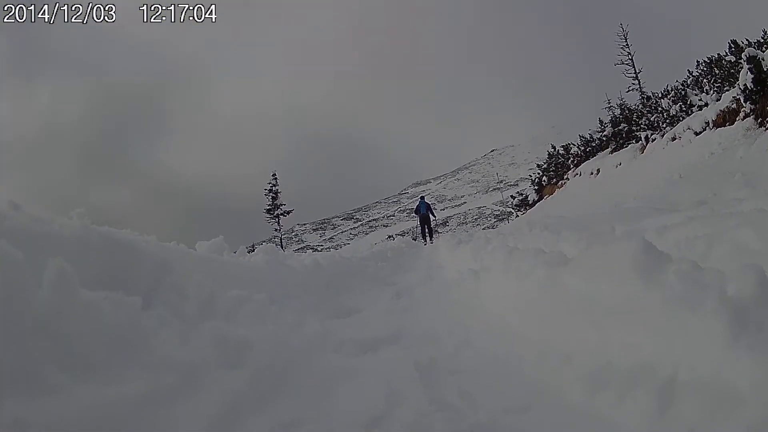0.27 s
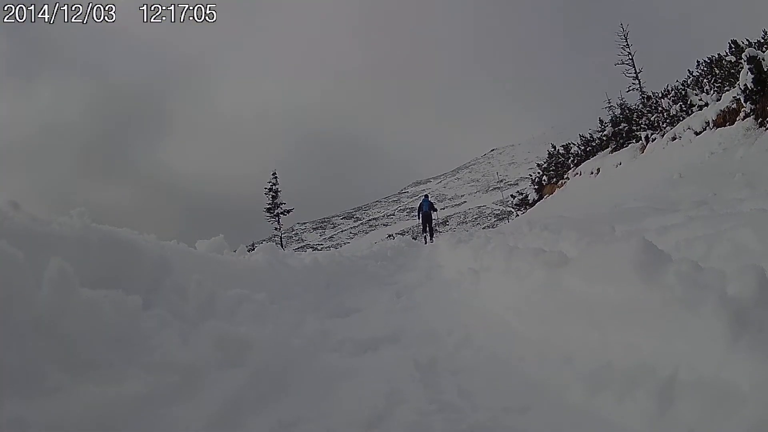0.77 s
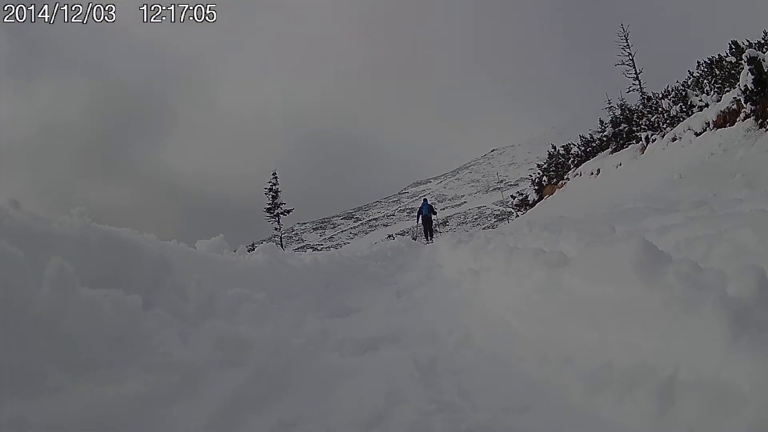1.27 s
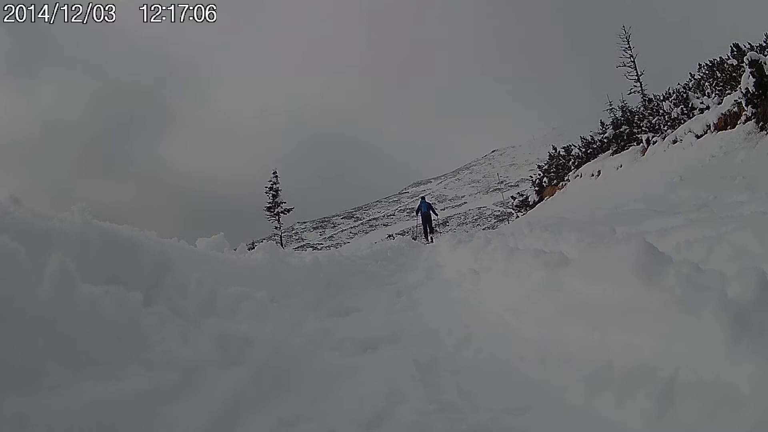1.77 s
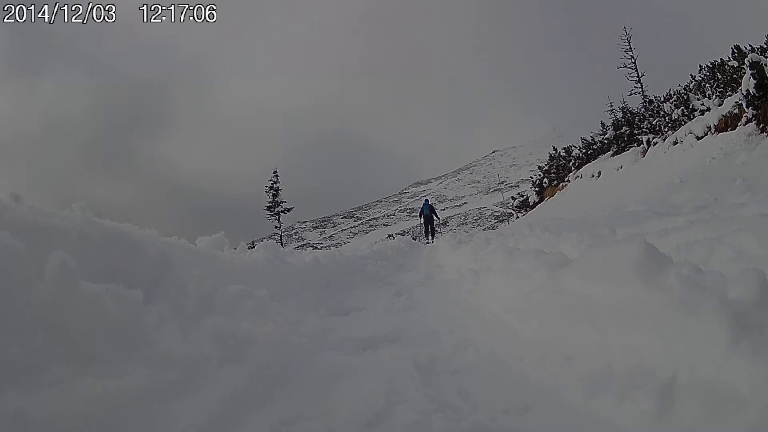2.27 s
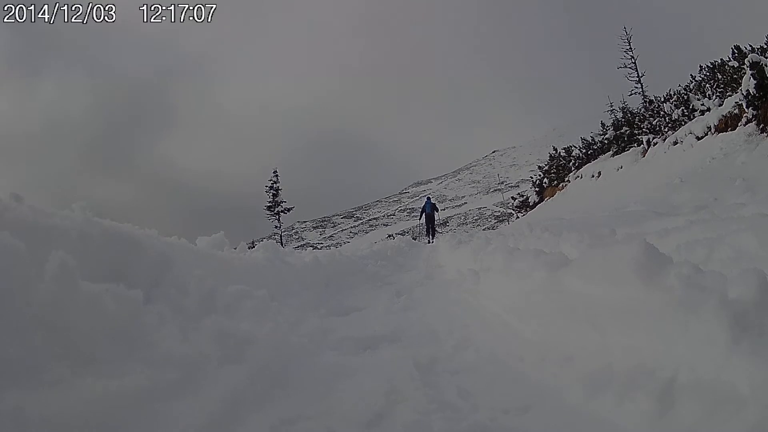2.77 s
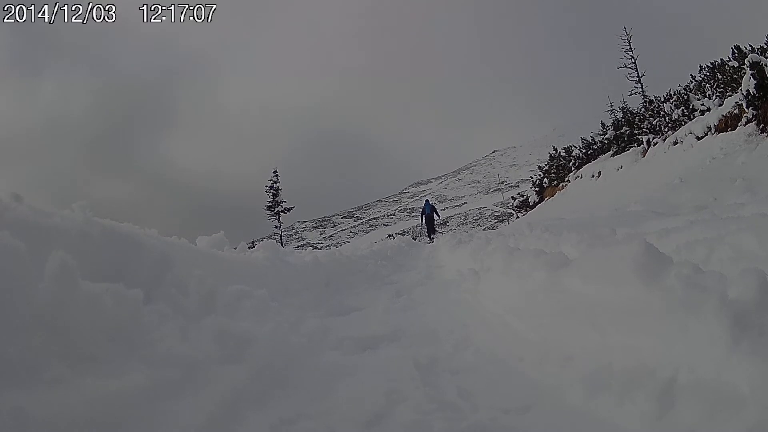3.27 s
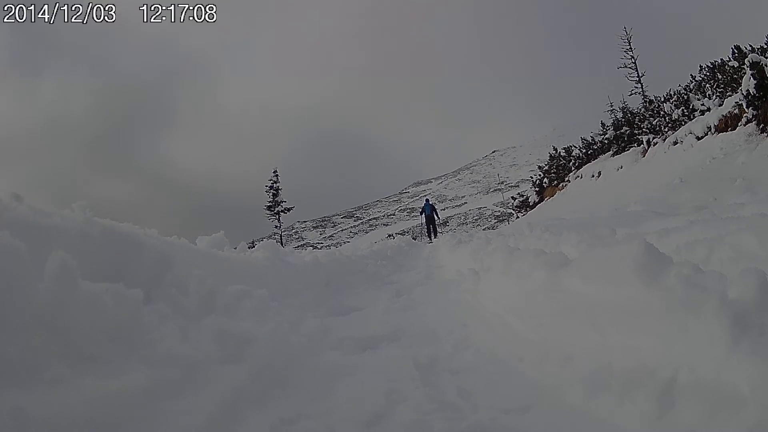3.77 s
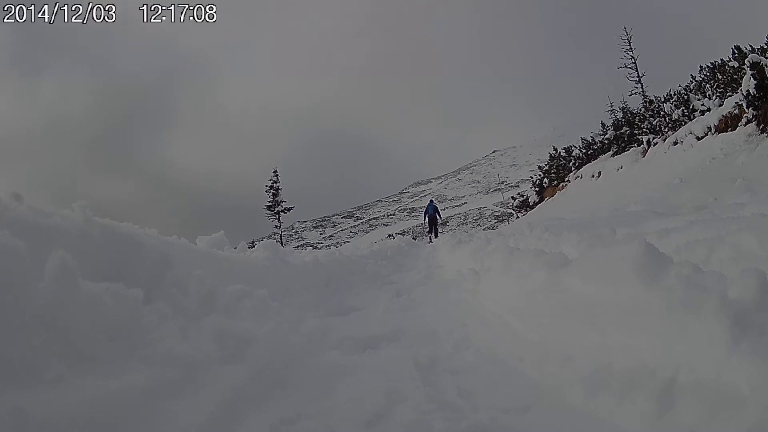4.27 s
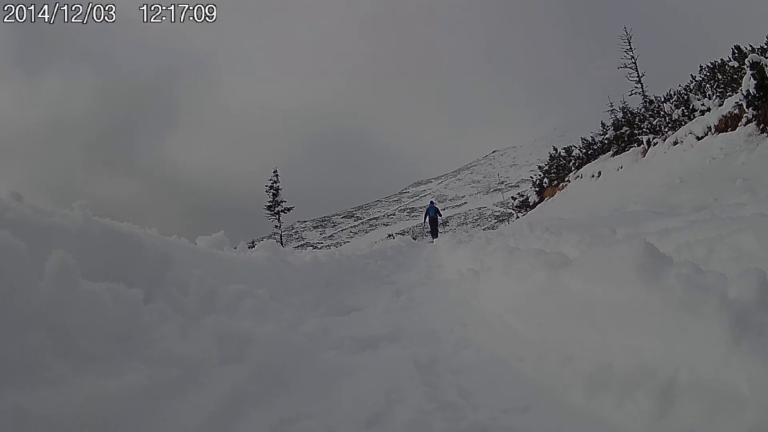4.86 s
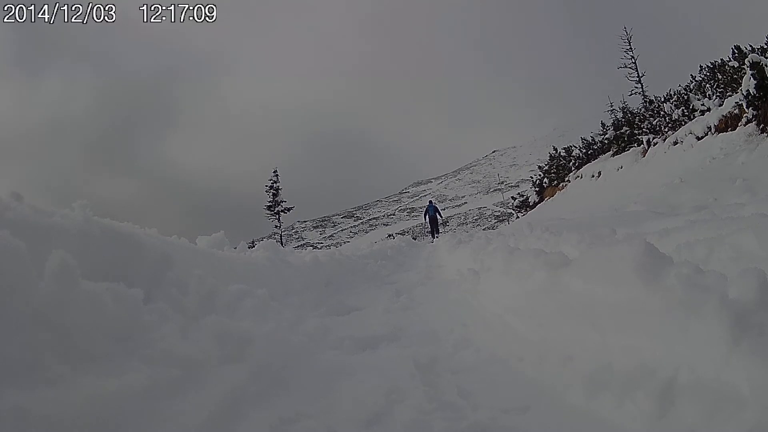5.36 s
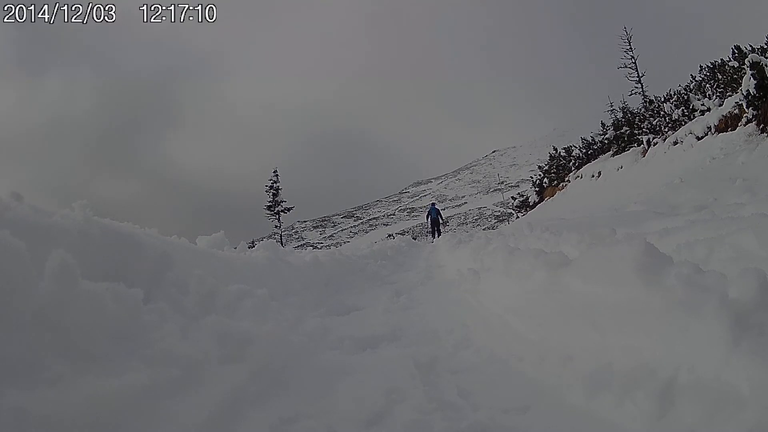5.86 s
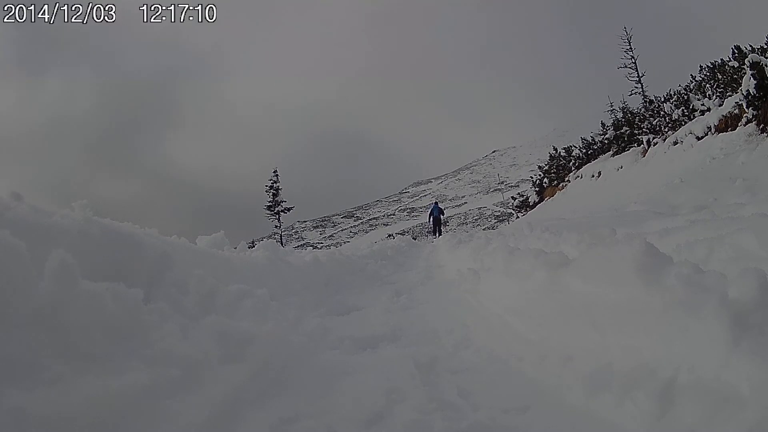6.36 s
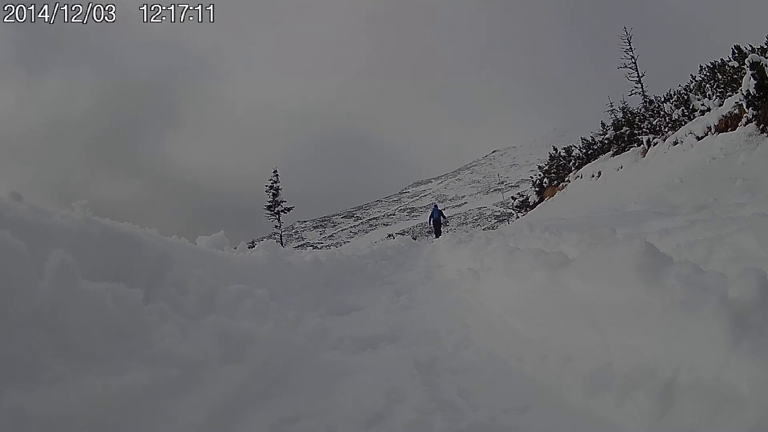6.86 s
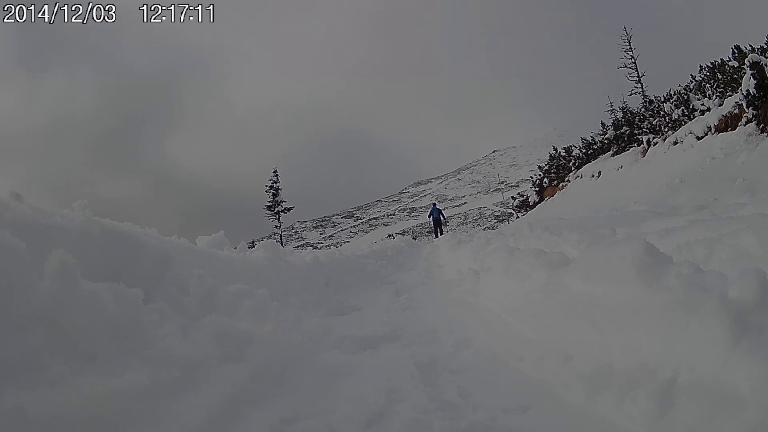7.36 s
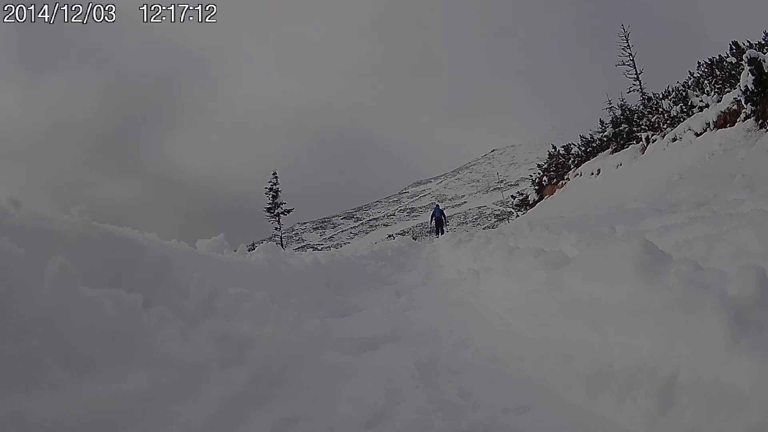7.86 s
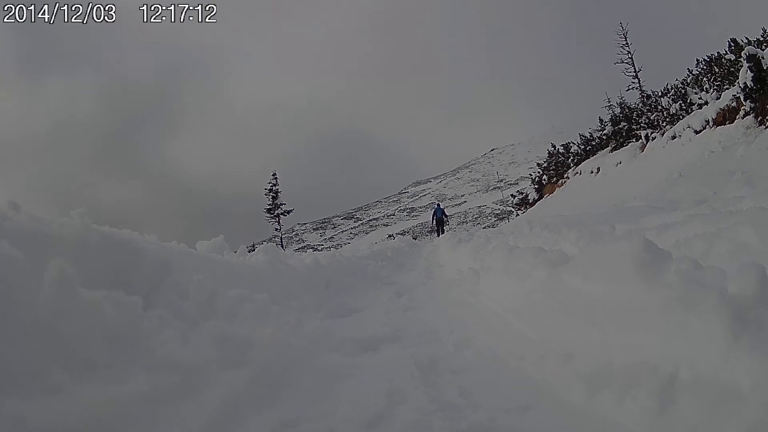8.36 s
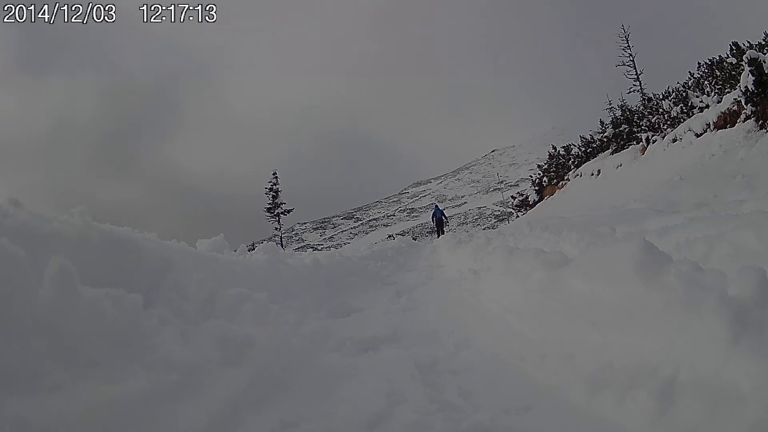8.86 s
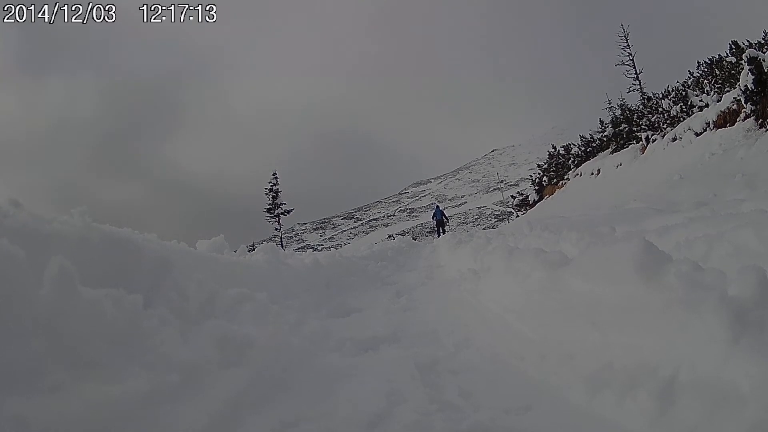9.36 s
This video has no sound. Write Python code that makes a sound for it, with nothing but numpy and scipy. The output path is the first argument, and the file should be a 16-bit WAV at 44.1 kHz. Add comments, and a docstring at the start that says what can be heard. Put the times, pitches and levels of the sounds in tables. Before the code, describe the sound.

Handling noise from a small camera lying in snow: low booms, scuffs, crunches and creaks, a long faint lull, then another burst, over steady hiss.

```python
"""Low booms and soft scuffs come first, then the crunch and creak of snow, all in the left channel.
A small camera lies in deep snow on a slope, and the snow packs and slips against its housing.
Each slip rings the housing: single slips crunch, slips in quick succession creak, a few go tock.
Shoves rock it with a boom, loosened grains rub it; the loudest hits overload the recorder with a crackle.
Behind this lie hiss and the whine and chirr of the electronics; the right channel holds only hiss."""
import sys
import numpy as np
from scipy import signal
from scipy.fft import rfft, irfft
from scipy.io import wavfile
from scipy.ndimage import uniform_filter1d, map_coordinates

SR = 44100
rng = np.random.default_rng(int(sys.argv[2]) if len(sys.argv) > 2 else 0)


def store_pcm(level_fs):
    """Save levels as 16-bit WAV."""
    pcm = np.round(np.clip(level_fs, -1, 1) * 32767).astype(np.int16)
    wavfile.write(sys.argv[1], SR, np.atleast_2d(pcm).T)


N = 424241  # length of the scene in samples
RING_S = np.arange(4096) / SR  # time axis of one ring [s]
LEAD_S = .012  # time the grains chatter before a release [s]


def gain_of(db):
    """Turns decibels into a factor."""
    return 10 ** (np.asarray(db) / 20)


def unit(x):
    """Scales a sound to energy 1."""
    return x / np.sqrt(np.sum(x ** 2) + 1e-20)


def rms_10ms(x):
    """Scales a sound so that energy 1 becomes an rms of 1 over 10 ms."""
    return x * np.sqrt(SR / 10 ** 2)


def add(mix, s, sound):
    """Lays a sound into the mix at time s."""
    part = mix[max(round(s * SR), 0):][:len(sound)]
    part += sound[:len(part)]


def band(x, hz, kind, order):
    """Keeps part of the frequency range with a Butterworth filter."""
    sos = signal.butter(order, np.minimum(hz, SR / 2 - 1), kind, fs=SR, output="sos")
    return signal.sosfilt(sos, x)


def ring(modes, t):
    """Sums the damped sines that follow one blow; t60 is the time to fade by 60 dB."""
    return sum(gain_of(db - 60 * t / t60) * np.sin(2 * np.pi * hz * t) for hz, db, t60 in modes)


# how firmly the snow presses on the camera: (time [s], pressure [0-1])
SNOW_PRESSURE = [(7.32, 0), (7.41, 0.91), (8.57, 0.87), (8.68, 0.04)]


def pressure(s):
    """Gives how firmly the snow presses at time s, from 0 to 1."""
    return np.clip(np.interp(s, *np.transpose(SNOW_PRESSURE)), 0, 1)


# ways the housing rings, levels relative within a register:
# (frequency [Hz], level lying loose [dB], level pressed into the snow [dB], fade t60 [s])
HOUSING_MODES = [(168.8, -21.5, -3.5, 0.12), (285.4, -7.5, 2.5, 0.099), (393.7, 1.5, 10.5, 0.023),
                 (458.2, 2.5, -7.5, 0.038), (626, 5, -3.5, 0.0063), (780, -13, -23.5, 0.0067),
                 (948, -2.5, 12.5, 0.022), (1226.5, 6.5, 15.5, 0.013), (1351, -5.5, 10.5, 0.027),
                 (1470, -14.5, 5, 0.03), (1931, -11.5, -12, 0.04), (2006.4, 5.5, 16, 0.019),
                 (2257, -6, 11.5, 0.0058), (2564, -16, -7.5, 0.0099), (2900, -12.5, 2, 0.018)]
# pitch ranges of the housing, in order knock, clack and ring: (low edge [Hz], high edge [Hz])
PITCH_RANGES = [(150, 700), (700, 1750), (1750, 3400)]


def housing(skirt=1.45, muffle_hz=2900):
    """Prepares the housing's modes, sorted into knock, clack and ring; snow swallows the treble."""
    registers = []
    for low, high in PITCH_RANGES:
        members = [mode for mode in HOUSING_MODES if low <= mode[0] < high]
        freqs, loose_db, pressed_db, fades = np.transpose(members)
        modes = []
        for hz, t60 in zip(freqs, fades):
            # steep flanks keep the valleys between the modes dark
            edges = [hz / skirt, hz * skirt]
            modes.append(band(ring([(hz, 0, t60)], RING_S), edges, "bandpass", order=2))
        modes = band(np.array(modes), muffle_hz, "lowpass", order=4)
        # the double length leaves room for the ring to run out
        registers.append((rfft(modes, 2 * len(RING_S)), loose_db, pressed_db))
    return registers


def slip(body, s, length, grit, levels_db, spread=0.52, swell=0.0013, chatter=0.077,
         chatter_hz=1955, contact_db=4.0, detune=0.027):
    """Grains chatter up to one release and die away; the housing rings in each register."""
    grit = np.clip(grit, 0, 1)  # 0 is one clean release, 1 is all chatter
    t = RING_S - LEAD_S  # the release is at t = 0
    pressed = pressure(s)
    burst = np.exp(-abs(t) / (spread * length))
    force = grit * unit(rng.standard_normal(len(t)) * burst)
    force[round(LEAD_S * SR)] += 1 - grit
    # against a loose housing the friction locks to one pitch: a short squeak
    squeak = unit(burst * np.cos(2 * np.pi * chatter_hz * t))
    force += chatter * (1 - pressed) * squeak
    push = rfft(force, 2 * len(t))
    # soft snow gives way gradually
    rise = 1 + 0.12 * np.tanh((t - swell) / swell)
    # each slip presses on another spot, which shifts the pitch and the balance of the modes
    stretch = 1 + detune * grit * rng.standard_normal()
    read_at = (t * stretch + LEAD_S) * SR
    out = np.zeros(len(t))
    for db, (modes, loose_db, pressed_db) in zip(levels_db, body):
        mode_db = loose_db + pressed * (pressed_db - loose_db)
        mode_db = mode_db + contact_db * grit * rng.standard_normal(len(modes))
        answer = irfft(gain_of(mode_db) @ modes * push)[:len(t)]
        out += gain_of(db) * unit(rise * map_coordinates(answer, [read_at], order=3))
    return out


# single slips, levels relative:
# (time [s], length scale of the chatter [s], level [dB], depth as low knock over high ring [dB])
SINGLE_SLIPS = [(0.2618, 0.0023, -35.5, -11), (0.277, 0.0033, -35, 1), (0.3118, .008, -25, 1),
                (0.336, 0.022, -29, 0), (0.3715, 0.012, -35, 10), (0.457, 0.0048, -21.5, 3),
                (0.8657, 0.0031, -29, -11), (1.003, .004, -31.5, -7), (1.079, 0.0058, -22.5, 4.5),
                (1.249, .005, -17.5, -0.5), (1.2575, 0.0009, -18.5, -0.5), (1.2812, 0.0054, -22.5, -13.5),
                (1.369, 0.004, -20, 5), (1.38, 0.0031, -20.5, -7), (1.6458, .004, -31, -10.5),
                (1.703, 0.0075, -21.5, 2.5), (1.7418, 0.0096, -22.5, -14.5), (1.917, 0.0027, -47.5, -2),
                (2.407, .003, -53, -2), (2.582, 0.0031, -42, -11), (2.622, 0.0027, -40.5, -3),
                (2.77, 0.0029, -43.5, 23), (2.853, 0.0066, -43, -5), (2.897, 0.019, -47, 19),
                (3.061, 0.016, -43, 11.5), (3.4226, 0.0065, -45, -4), (4.22, 0.0044, -36, 0),
                (4.6577, 0.016, -36.5, 4), (4.694, 0.014, -33.5, -3), (7.301, 0.0044, -30.5, -2),
                (7.3767, 0.007, -39, -3), (7.3997, 0.0031, -24, 1.5), (7.42, 0.0017, -23, 7),
                (7.428, 0.0011, -21.5, 1), (7.5576, 0.0065, -40.5, 22), (7.7635, 0.002, -25.5, 2),
                (7.7821, 0.0055, -31, -14), (8.048, .008, -28.5, 15.5), (8.1762, 0.0022, -33.5, -5),
                (8.108, 0.0063, -37, 15), (8.28, 0.0043, -31, 10), (8.306, 0.0037, -31, 6.5),
                (8.475, .003, -30.5, 2), (8.4982, 0.0021, -30.5, 1), (8.5655, 0.0023, -25, -9.5),
                (8.631, 0.0023, -33, -2), (8.674, .003, -32, -7), (8.772, 0.003, -45, 0.5),
                (9.088, 0.0024, -29.5, -5.5), (9.313, 0.0032, -54.5, 28.5)]


def crunches(body, grit=0.72, level_db=-2.5, clack_db=-1.0, packed_clack_db=2.5):
    """Plays separate slips of packed snow; deep ones knock, shallow ones ring."""
    out = np.zeros(N)
    for s, length, db, depth_db in SINGLE_SLIPS:
        middle_db = clack_db + packed_clack_db * pressure(s)
        colour_db = np.array([depth_db / 2, middle_db, -depth_db / 2])
        add(out, s - LEAD_S, slip(body, s, length, grit, db + colour_db))
    return rms_10ms(out) * gain_of(level_db)


# one curve for each creak, levels relative: (time [s], pace [slips per s], level [dB])
CREAK_CURVES = [
    [(0.468, 100, -39), (0.503, 134, -27), (0.535, 82, -36.5), (0.57, 72, -35), (0.595, 61, -31),
     (0.62, 67, -34.5), (0.65, 91, -30), (0.692, 86, -33.5)],
    [(1.099, 105, -33.5), (1.12, 77, -25.5), (1.14, 192, -29.5), (1.243, 212, -29)],
    [(1.302, 53, -30), (1.345, 82, -26), (1.405, 166, -38.5), (1.445, 110, -28), (1.5, 85, -34),
     (1.535, 70, -34.5), (1.565, 99, -22)],
    [(1.72, 90, -35), (1.772, 112, -35), (1.797, 166, -26.5), (1.835, 106, -34), (1.866, 68, -32.5)],
    [(7.665, 67, -33), (7.72, 84, -31.5), (7.81, 90, -29), (7.862, 95, -32.5)],
    [(7.904, 65, -33), (7.935, 58.6, -36.5), (7.965, 99, -33.5), (8.02, 108.5, -32), (8.085, 166, -33.5),
     (8.15, 152, -36), (8.2, 150.5, -32.5), (8.27, 138, -35.5)],
    [(8.287, 44, -35), (8.34, 61, -35.5), (8.385, 105, -32.5), (8.43, 81, -32.5), (8.46, 51, -32)],
]
# colour of a creak at the easy pace:
# (pressure [0-1], low knock [dB], middle clack [dB], high ring [dB])
COLOUR_BY_PRESSURE = [(0, -6, -2.5, 2), (0.999, 2.5, 0, -4.5)]
EASY_RATE = 100  # pace that has the colour above [slips per s]


def creaks(body, length=0.0088, easy_grit=.45, roughening=0.66, polish=0.29, jitter=0.045,
           uneven_db=1.5, fast_knock_db=2.5, level_db=-3):
    """Snow sticks and slips: cleanly and regularly when slow, in uneven smears with more knock when fast."""
    out = np.zeros(N)
    pressures, *colours = np.transpose(COLOUR_BY_PRESSURE)
    for curve in CREAK_CURVES:
        times, rates, levels_db = np.transpose(curve)
        s = times[0]
        while s < times[-1]:
            rate = np.interp(s, times, rates)
            db = np.interp(s, times, levels_db)
            pressed = pressure(s)
            # firm pressure packs the snow smooth, so the creak buzzes at a clearer pitch and sounds deeper
            roughness = min(easy_grit * (rate / EASY_RATE) ** roughening, 1)
            grit = roughness * (1 - polish * pressed)
            colour_db = np.array([np.interp(pressed, pressures, c) for c in colours])
            colour_db[0] += fast_knock_db * np.log2(rate / EASY_RATE)
            size, wait = rng.standard_normal(2)
            sound = slip(body, s, length, grit, db + colour_db + uneven_db * size)
            # the factor keeps the loudness independent of the pace
            add(out, s - LEAD_S, sound * np.sqrt(SR / rate))
            s += np.exp(jitter * grit * wait) / rate
    return out * gain_of(level_db)


# slips that catch the hollow middle mode of the housing, levels relative: (time [s], level [dB])
HOLLOW_SLIPS = [(5.127, -46), (8.6226, -19.5), (8.772, -41)]


def tocks(body, length=0.0027, grit=0.17, knock_db=-19, clack_db=-2, ring_db=-16):
    """Locks the friction to the middle mode: a short hollow tock."""
    out = np.zeros(N)
    colour_db = np.array([knock_db, clack_db, ring_db])
    for s, db in HOLLOW_SLIPS:
        sound = slip(body, s, length, grit, db + colour_db, chatter=0.95, chatter_hz=1190)
        add(out, s - LEAD_S, sound)
    return rms_10ms(out)


# ways the camera rocks on its bed of snow, levels relative: (frequency [Hz], level [dB], fade t60 [s])
ROCKING_MODES = [(57.65, -9.5, 0.81), (83.2, 0, 0.53)]
# shoves that rock the camera and scuff its housing, levels relative: (time [s], level [dB])
CAMERA_SHOVES = [(0.005, -27.5), (0.037, -24), (0.118, -25.5), (0.2, -25.5), (0.288, -22), (1.254, -15.5),
                 (1.382, -13.5), (1.789, -29), (4.227, -48.5), (4.701, -46), (7.429, -14), (7.737, -15.5),
                 (8.0, -20), (8.283, -26), (8.629, -33), (9.321, -43)]
# every single slip kicks the camera too: delay [s], level relative to the slip's table level [dB]
RECOIL_S, RECOIL_DB = .006, -12.5


def rocking(rise_s=.004, overload_level=0.2, lowest_hz=42, level_db=-3.0):
    """Booms as the camera rocks on springy snow; the largest swings overload the microphone and flatten."""
    out, t = np.zeros(N), np.arange(SR) / SR
    swing = ring(ROCKING_MODES, t) * np.tanh(t / rise_s)
    swing = band(swing, lowest_hz, "highpass", order=3)
    recoils = [(s + RECOIL_S, db + RECOIL_DB) for s, _, db, _ in SINGLE_SLIPS]
    for s, db in CAMERA_SHOVES + recoils:
        add(out, s, gain_of(db + level_db) * swing)
    return overload_level * np.tanh(out / overload_level)


def scuffs(body, lag=.012, length=0.02, grit=0.83, knock_db=-19, clack_db=-27, ring_db=-25):
    """Drags the housing over the snow after each shove, with a soft scuff."""
    out = np.zeros(N)
    colour_db = np.array([knock_db, clack_db, ring_db])
    for s, db in CAMERA_SHOVES:
        add(out, s + lag - LEAD_S, slip(body, s, length, grit, db + colour_db))
    return rms_10ms(out)


def rubbing(body, motion, settle=0.098, grains_per_s=700, knock_db=-27, clack_db=-22, ring_db=-20):
    """Loosens grains with each movement; they rub the housing until the snow settles."""
    keep = np.exp(-1 / (settle * SR))
    loose = signal.lfilter([1 - keep], [1, -keep], abs(motion))
    hits = rng.random(N) < grains_per_s / SR
    grains = rng.standard_normal(N) * hits * np.sqrt(SR / grains_per_s)
    rings = [unit(irfft(gain_of(loose_db) @ modes)) for modes, loose_db, _ in body]
    answer = gain_of([knock_db, clack_db, ring_db]) @ np.array(rings)
    return signal.oaconvolve(grains * loose, answer)[:N]


# crackles of the overloaded recorder, peak levels relative: (time [s], level [dB])
OVERLOAD_CRACKLES = [(1.2478, -28.5), (1.2572, -38), (1.284, -37), (1.3738, -36.5), (1.383, -57.5),
                     (1.7443, -44), (7.4214, -34.5), (7.761, -45), (8.1771, -60), (8.5647, -72)]


def overload_crackles(decay=0.003, low_hz=2300, high_hz=3600, level_db=2):
    """Adds a brief bright burst of fading noise at each listed time, as the recorder overloads."""
    out = np.zeros(N)
    for s, db in OVERLOAD_CRACKLES:
        burst = rng.standard_normal(len(RING_S)) * np.exp(-RING_S / decay)
        crackle = band(burst, low_hz, "highpass", order=2)
        crackle = band(crackle, high_hz, "lowpass", order=2)
        add(out, s, gain_of(db + level_db) * crackle / abs(crackle).max())
    return out


# steady hiss of each channel: (frequency [Hz], level [dB per Hz])
LEFT_SPECTRUM = [(30, -89), (80, -81), (160, -91.5), (400, -92.5), (850, -95), (1300, -87.5), (2100, -89),
                 (3100, -90), (4100, -103.3), (6500, -109), (9000, -112.5), (15000, -115.8)]
RIGHT_SPECTRUM = [(30, -120.4), (200, -118.0), (850, -109.2), (1300, -100.8), (2100, -99.6), (3100, -102.8),
                  (4100, -111.0), (6500, -115.5), (15000, -116.0)]


def hiss(points):
    """Shapes random noise to a given spectrum: a steady hiss."""
    hz, db = np.transpose(points)
    freqs = np.fft.rfftfreq(N, 1 / SR)
    shape = gain_of(np.interp(np.log(freqs + 1), np.log(hz), db))
    return irfft(rfft(rng.standard_normal(N)) * shape, N) * np.sqrt(SR / 2)


# whine of the electronics: (frequency [Hz], rms level [dB])
WHINE_TONES = [(7783, -84), (7933, -70), (7963, -82.5), (8083, -81)]


def whine():
    """Sounds the thin steady sine tones of the electronics."""
    t = np.arange(N) / SR
    out = np.zeros(N)
    for hz, db in WHINE_TONES:
        out += np.sqrt(2) * gain_of(db) * np.sin(2 * np.pi * (hz * t + rng.random()))
    return out


# chirr of the electronics while it is on: (frequency [Hz], level [dB per Hz])
CHIRR_SPECTRUM = [(30, -140), (4200, -125), (5000, -103), (5700, -114), (6600, -101), (7400, -122),
                  (9200, -124), (10200, -106), (11400, -112), (12500, -135)]


def chirr(spell_s=.08, share=.5):
    """Switches a faint high noise of the electronics on and off at random in short spells."""
    on = rng.random(N // 100) < share
    spell = (np.arange(N) / SR / spell_s).astype(int)
    # averaging over 200 samples softens the switching
    switch = uniform_filter1d(on[spell] * 1., size=200)
    return hiss(CHIRR_SPECTRUM) * switch


def scene():
    """Feeds snow and electronics to the left channel; the right holds only hiss."""
    body = housing()
    motion = crunches(body) + tocks(body) + creaks(body) + scuffs(body) + rocking()
    snow = motion + rubbing(body, motion) + overload_crackles()
    left = 2 * snow + hiss(LEFT_SPECTRUM) + whine() + chirr()
    return np.array([left, hiss(RIGHT_SPECTRUM)])


def record(dry):
    """Rounds off the loudest peaks, then removes the highest treble."""
    held = dry / (1 + (dry / .9) ** 8) ** (1 / 8)
    lowpass = signal.firwin(511, 15800, window=("kaiser", 9), fs=SR)  # edge at 15800 Hz
    return signal.oaconvolve(held, lowpass[None], "same")


dry = scene()
out = record(dry)
store_pcm(out)
```